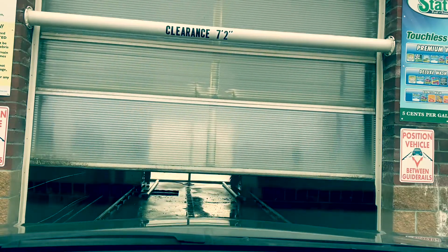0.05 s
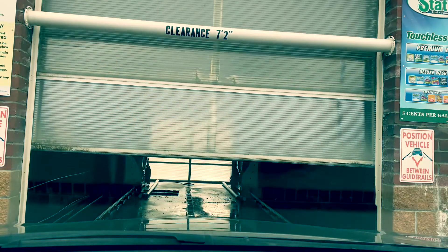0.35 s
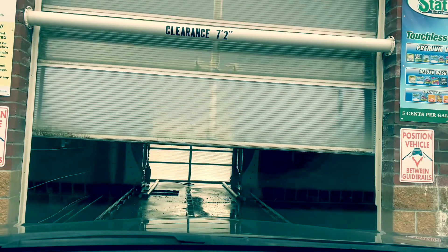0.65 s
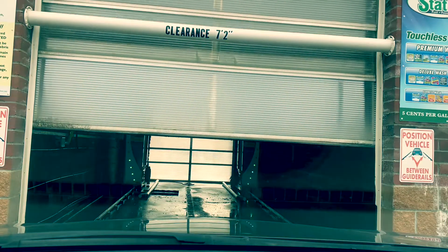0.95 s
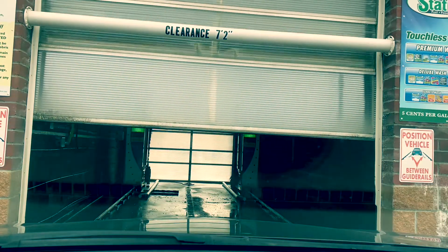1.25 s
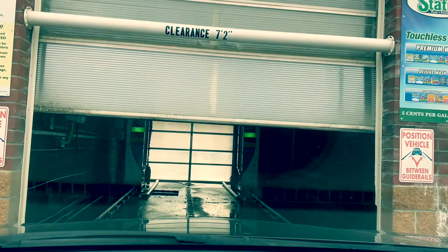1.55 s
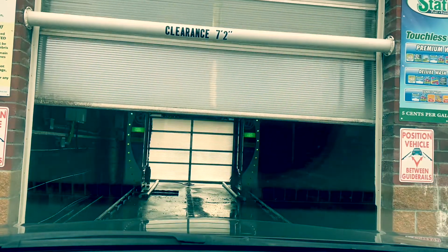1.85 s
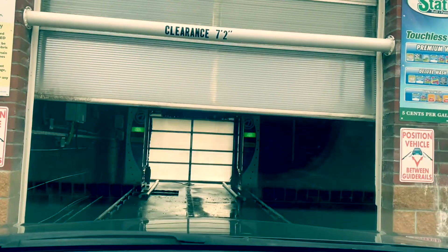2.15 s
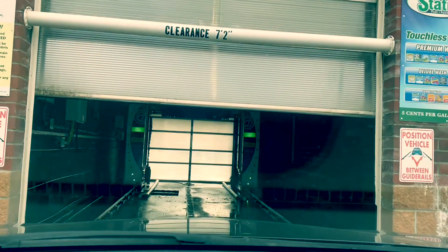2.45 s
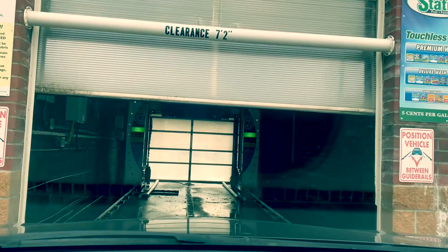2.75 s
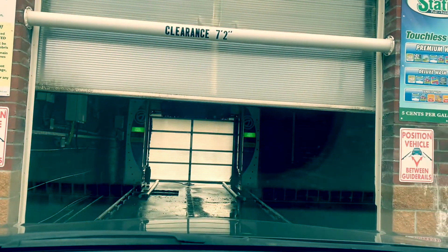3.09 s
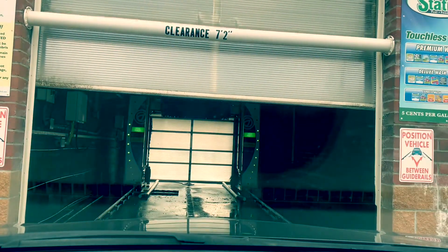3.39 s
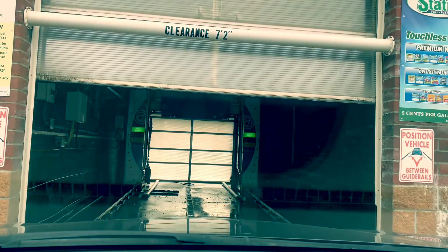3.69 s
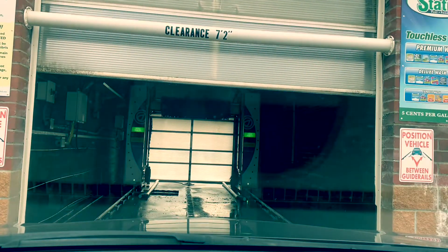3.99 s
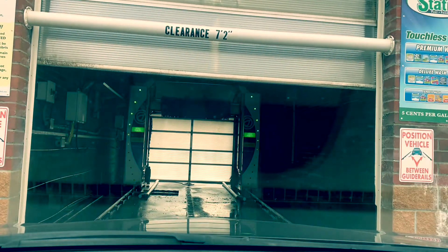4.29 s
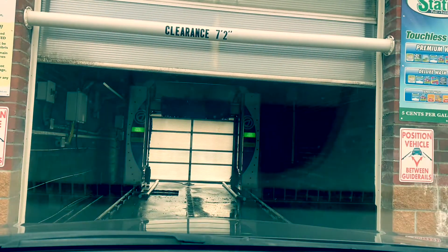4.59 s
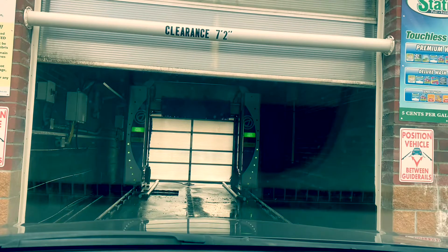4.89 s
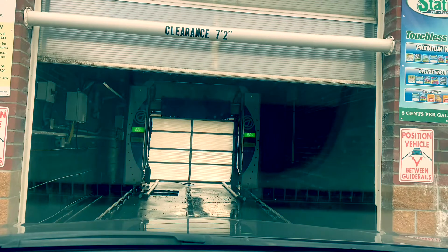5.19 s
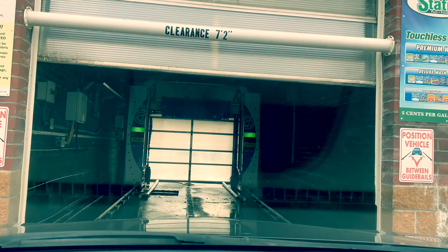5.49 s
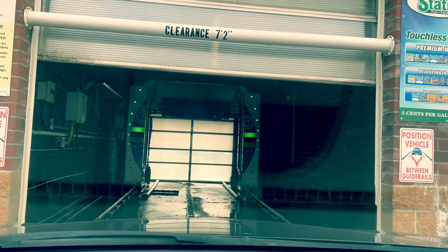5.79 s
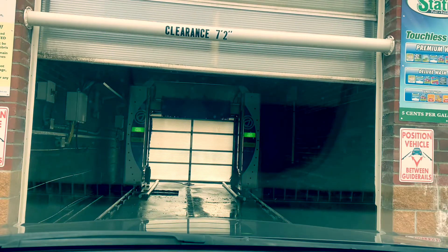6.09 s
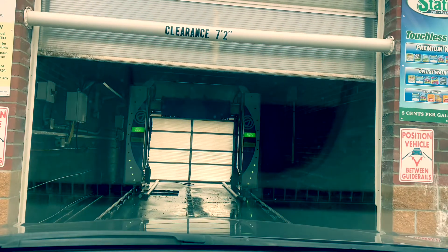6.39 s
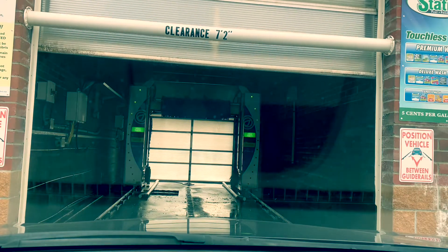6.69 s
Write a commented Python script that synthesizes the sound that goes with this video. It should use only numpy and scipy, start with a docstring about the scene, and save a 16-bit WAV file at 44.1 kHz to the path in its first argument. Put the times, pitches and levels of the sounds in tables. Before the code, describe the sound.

Low engine hum and vent fan in a car, one loud thud like a car door shutting, and a motorized door rolling up.

```python
"""First you hear a low engine hum and a vent fan, from inside a car idling at a car wash.
Beyond the windscreen a roll-up door rises: its motor whirs and its rollers rumble, rasp and squeak.
Near 2 seconds one heavy clunk, like a car door pulled shut, booms in the cabin and sets the trim ringing.
Small knocks, clicks and rustles come and go. A phone with two ports (microphone openings) hears it all."""
import sys
import numpy as np
from scipy import signal
from scipy.fft import rfft, irfft, next_fast_len
from scipy.io import wavfile
from scipy.ndimage import uniform_filter1d

SR = 44100
rng = np.random.default_rng(int(sys.argv[2]) if len(sys.argv) > 2 else 0)


def to_wav(s):
    """Save 16-bit WAV."""
    ch = np.atleast_2d(s).T  # columns
    pcm = np.round(np.clip(ch, -1, 1) * 32767)  # PCM
    wavfile.write(sys.argv[1], SR, pcm.astype(np.int16))


N = 301952
TIME = np.arange(N) / SR
FREQ = np.arange(N // 2 + 1) * SR / N
LEFT_RIGHT = np.array([[1], [-1]])


def undb(db):
    """Turn decibels into a gain."""
    return 10 ** (np.asarray(db) / 20)

def unit(x):
    """Scale to an average (rms) level of 1."""
    return x / np.sqrt(np.mean(x ** 2))

def on_log_axis(points, hz):
    """Read between (Hz, value) points, spaced by octaves."""
    f, value = np.transpose(points)
    return np.interp(np.log(hz + 1), np.log(f), value)

def wobble(rate):
    """A smooth random wobble of size 1, with `rate` new values a second."""
    hold = int(SR / rate)
    steps = np.repeat(rng.standard_normal(N // hold + 1), hold)
    return unit(uniform_filter1d(uniform_filter1d(steps, hold), hold)[:N])

def noise(spectrum, tilt_db=0, ring_hz=1000, ring=0, size=N, low_hz=30):
    """Shaped stereo noise that can ring at one pitch; the bass is alike on both sides."""
    padded = next_fast_len(size, real=True)
    hz = np.arange(padded // 2 + 1) * SR / padded
    mid, side = rfft(rng.standard_normal((2, padded)))
    gain = undb(on_log_axis(spectrum, hz) + tilt_db * np.log2(hz + 1))
    gain *= hz ** 2 / (hz ** 2 + low_hz ** 2)  # thin out the bass
    gain *= 1 + ring / (1 + (18 * (hz / ring_hz - 1)) ** 2)
    width = np.interp(hz, [190, 700, 2000], [0, .36, .52])
    return unit(irfft(gain * (mid + LEFT_RIGHT * side * width), padded)[:, :size])

def burst(t, rise, t60):
    """Swell up to t = 0 and die away; both times are seconds per 60 dB."""
    return np.exp(-np.log(1000) * np.maximum(-t / rise, t / t60))

def step(s, duration):
    """A smooth change from 0 to 1 around time s."""
    return (1 + np.tanh((TIME - s) / duration)) / 2

def swells(rows):
    """Smooth bumps in loudness, added up."""
    return sum(undb(db) * np.exp(-((TIME - s) / half) ** 2) for s, half, db in rows)

def add(out, s, sound):
    """Mix a short sound in at time s."""
    start = int(s * SR)
    out[..., start:start + sound.shape[-1]] += sound[..., :N - start]

def mode(hz, t60):
    """One ringing tone; its ring time t60 is the seconds it takes to fade by 60 dB."""
    t = TIME[:2 * SR]
    return np.sin(2 * np.pi * hz * t) * np.exp(-np.log(1000) * t / t60)

def struck(modes):
    """A struck part rings with several tones, each starting up or down by chance."""
    return sum(rng.choice([-1, 1]) * undb(db) * mode(hz, t60) for hz, db, t60 in modes)

def rubbed(s, half, hz, glide, rough, slip_rate):
    """A gliding friction tone around time s: steady at roughness 0, all chance at 1."""
    t = TIME - s
    slip = np.sqrt(1 - rough ** 2) + rough * (wobble(slip_rate) + 1j * wobble(slip_rate)) / np.sqrt(2)
    tone = np.exp(2j * np.pi * (hz + glide * t / 2) * t)
    return np.exp(-(t / half) ** 4) * np.real(slip * tone)

def reflections(x, strength=0.12, count=14):
    """Glass and trim send back quick echoes that colour the sound."""
    delays = rng.uniform(0.0033, .035, count)
    echoes = sum(rng.choice([-1, 1]) * np.roll(x, int(s * SR), axis=-1) for s in delays)
    return unit(x + strength * echoes)

def hollow(x, hz=588.2, width_hz=420):
    """Make the middle pitches wide and hollow: near hz the left wave is turned upside down."""
    pole = hz ** 2 - FREQ ** 2 + 1j * FREQ * width_hz
    return np.array([irfft(rfft(x[0]) * np.conj(pole) / pole, N), x[1]])

def lean(x, balance):
    """Tip a sound to the left or right, pitch by pitch."""
    return irfft(rfft(x) * undb(LEFT_RIGHT * on_log_axis(balance, FREQ) / 2), N)


# The colour of the hiss. Each row: frequency in Hz, level in dB.
HISS_SPECTRUM = [(2500, -41.5), (5000, 3), (10000, -0.5), (12000, -1), (15000, -18.5)]
# Puffs of hiss. Each row: middle in seconds, half length in seconds, level in dB.
HISS_PUFFS = [(.38, 0.13, -72), (1.08, 0.25, -74), (6.1, 0.101, -84)]

def hiss(db=-75, fade_db_per_s=0.53):
    """A fine hiss fades slowly, with a few puffs on top."""
    level = undb(db - fade_db_per_s * TIME) + swells(HISS_PUFFS)
    return noise(HISS_SPECTRUM) * level * undb(wobble(32))

# The colour of the cabin's rumble. Each row: frequency in Hz, level in dB.
RUMBLE_SPECTRUM = [(20, -31), (34, -0.5), (45, -3), (60, 3.5), (80, -8.5), (120, -12.5), (180, -25),
                   (400, -77.5)]

def rumble(db=-48, fade_db_per_s=2):
    """A deep rumble wavers and slowly fades."""
    return noise(RUMBLE_SPECTRUM) * undb(db - fade_db_per_s * TIME + 1.2 * wobble(4.4))

# Fan and drone as the cabin colours them. Each row: frequency in Hz, level in dB.
FAN_SPECTRUM = [(100, 1), (125, 0.5), (180, -2.5), (270, -1), (340, -9.5), (400, -13), (470, -5.5),
                (525, 3.5), (590, -5.5), (665, 2), (720, -7), (800, -4.5), (900, -16.5), (1000, -26),
                (1090, -15.5), (1320, -13.5), (1450, -26), (4000, -31), (15000, -62)]
SHUT_S, SHUT_TIME_S = 2.4, .15  # after the clunk the fan drops and the drone comes in

def vent_fan(db=-55, drop_db=15.5, rise_db_per_s=1.8, pan_db=3):
    """Air rushes from the vent; it drops after the clunk, then creeps back up."""
    level_db = db - drop_db * step(SHUT_S, SHUT_TIME_S) + rise_db_per_s * np.maximum(TIME - SHUT_S, 0)
    return noise(FAN_SPECTRUM, low_hz=90) * undb(level_db + 0.7 * wobble(13) + LEFT_RIGHT * pan_db / 2)

def wash_bay(db=-61.5, pan_db=-5):
    """An even drone, probably machinery in the bay."""
    return noise(FAN_SPECTRUM, low_hz=253) * step(SHUT_S, SHUT_TIME_S) * undb(db + LEFT_RIGHT * pan_db / 2)

# The tones of the engine. Each row: multiple of the firing rate, relative level in dB.
ENGINE_TONES = [(1, 2), (2, -2.5), (3, -8.5), (4, -26.5), (6, -13)]

def engine(firing_hz=31.2, db=-54.5, drop_db=4.5, settles_s=4.74):
    """Idle firings shake the cabin with low, unsteady tones; the shake eases late on."""
    firings = np.cumsum(firing_hz * (1 + 0.0077 * wobble(1.9))) / SR
    hum = sum(undb(tone_db + 0.98 * wobble(11)) * np.sin(2 * np.pi * k * (firings + rng.random()))
              for k, tone_db in ENGINE_TONES)
    return unit(hum) * undb(db - drop_db * step(settles_s, 0.18))

# The colour of a rustle. Each row: frequency in Hz, level in dB.
RUSTLE_SPECTRUM = [(350, -3.5), (470, -1), (545, 8.5), (605, -3.5), (680, 8), (755, 3.5), (830, -3.5),
                   (930, -3.5), (1020, -14), (1250, -5), (1600, -17), (2500, -28), (5000, -41),
                   (12000, -48)]
# The rustles. Each row: middle in seconds, half length in seconds, level in dB.
RUSTLE_SWELLS = [(.96, 0.37, -51), (2.285, 0.056, -48.5), (2.67, 0.083, -49)]

def rustles(pan_db=-3):
    """Soft uneven brushing close by, a little to the right."""
    brushing = noise(RUSTLE_SPECTRUM, low_hz=246) * swells(RUSTLE_SWELLS)
    return brushing * undb(1.2 * wobble(38) + LEFT_RIGHT * pan_db / 2)

# The colour of a knock or clack. Each row: frequency in Hz, level in dB.
KNOCK_SPECTRUM = [(100, -6), (200, 14), (320, 7), (600, -2.5), (900, -5.5), (1200, -2.5), (1500, -9.5),
                  (2000, -15), (3200, -21), (4400, -23.5), (6500, -31.5), (11000, -40), (15000, -51.5)]
# Knocks on the trim. Each row: time in seconds, level in dB, brightness in dB per octave,
# fade time in seconds, ring pitch in Hz, ring strength.
TRIM_KNOCKS = [(0.351, -43, -16, 0.11, 255, 16), (1.242, -56, 3.5, 0.05, 710, 2),
               (2.012, -43.5, 2.5, 0.11, 2210, 3), (2.033, -46.5, 9, 0.066, 11000, 0.99),
               (2.176, -55, 4, 0.12, 2185, 7.6), (2.237, -51.5, 6.5, 0.064, 2195, 9),
               (2.404, -48, 5, 0.081, 1230, 1.3), (2.845, -45, -5.5, 0.082, 180, 1.8),
               (3.017, -50, 7, 0.044, 4860, 0.96), (3.031, -47, -5, 0.18, 303, 2.9),
               (3.152, -41, -23, .2, 126, 2), (3.345, -43.5, -16, 0.089, 185, 4),
               (3.826, -48.5, 7.5, 0.032, 1900, 2.5), (4.543, -51, -3.5, 0.08, 338, 3),
               (5.049, -52.5, 10.5, 0.038, 6940, 1.8)]

def knocks():
    """Short grainy bursts from the trim: dull ones thud, bright ones click."""
    out, t = np.zeros((2, N)), TIME[:SR // 2]
    grain = undb(2 * wobble(600))
    for s, db, tilt_db, t60, hz, ring in TRIM_KNOCKS:
        contact = noise(KNOCK_SPECTRUM, tilt_db, hz, ring, size=len(t), low_hz=215)
        add(out, s, undb(db) * contact * burst(t - .003, 0.017, t60))
    return out * grain

# Clacks in the door's tracks. Each row: time in seconds, level in dB, brightness in dB per octave,
# fade time in seconds, ring level in dB.
TRACK_CLACKS = [(3.074, -36, 0.5, 0.116, -37.5), (3.137, -41, 0, 0.17, -49), (4.51, -51, 3, 0.18, -62),
                (4.929, -57, 5.5, 0.068, -77), (5.332, -51, 7.5, .045, -63)]
# Taps of a loose hinge. Each row: start in seconds, level in dB.
HINGE_TAPS = [(0.144, -59), (.2, -78), (0.484, -61), (0.634, -62), (0.656, -55), (.849, -56), (1.037, -51),
              (1.068, -58), (1.108, -56), (1.173, -52), (1.213, -51), (1.24, -57), (1.3, -65)]
# How the tracks, a small metal part and the hinge ring.
# Each row: pitch in Hz, level in dB, ring time in seconds.
TRACK_MODES = [(299, -3.5, 0.084), (498, -7.5, .06), (762, -10, .08), (1066, -1.5, 0.084),
               (1260, -6.5, 0.11), (1980, -5.5, 0.1), (2835, -22, 0.059), (3050, -14.5, 0.11),
               (4340, -15, 0.048)]
PING_MODES = [(1793, 2, 0.039), (2840, -7, 0.036), (5280, -1, 0.05), (6960, -13, 0.062)]
HINGE_MODES = [(940, -10, 0.066), (1090, -4, 0.082), (1324, 3.5, 0.1)]

def clacks(ping_s=4.931, ping_db=-53):
    """Hard contacts ring the hollow tracks; a small part pings once and a hinge chatters."""
    out, t = np.zeros((2, N)), TIME[:SR // 2]
    grain = undb(1.2 * wobble(600))
    for s, db, tilt_db, t60, ring_db in TRACK_CLACKS:
        contact = noise(KNOCK_SPECTRUM, tilt_db, size=len(t), low_hz=216)
        add(out, s, undb(db) * contact * burst(t - .003, 0.017, t60))
        add(out, s + .002, undb(ring_db) * struck(TRACK_MODES))
    add(out, ping_s, undb(ping_db) * struck(PING_MODES))
    for s, db in HINGE_TAPS:
        add(out, s, undb(db) * struck(HINGE_MODES))
    return out * grain

# The motor's speed, which sags under load. Each row: time in seconds, turns per second.
MOTOR_SPEED = [(3.2, 46.4), (3.33, 41.57), (3.62, 38.37), (4.2, 32.02), (4.4, 32.66), (5.1, 43.84),
               (5.33, 38.65), (5.6, 41.97), (6.33, 42.87), (6.55, 45.9), (6.85, 48)]
# The tones of its whir (ten slots pass per turn). Each row: multiple of the speed, relative level in dB.
MOTOR_TONES = [(1, 9.5), (5, 8.5), (10, 7.5), (20, -3), (30, -11)]
# Where it works hard. Each row: middle in seconds, half length in seconds, level in dB.
MOTOR_STRAINS = [(3.48, 0.17, -76.5), (4.2, 0.18, -75.5), (5.7, 0.79, -82.5)]

def motor(free_db=-85.5, housing_hz=1300, housing_width_hz=110, housing_db=6):
    """The shaft and slots whir, louder under strain; the housing boosts tones near its own pitch."""
    shaft_hz = np.interp(TIME, *np.transpose(MOTOR_SPEED))
    turns = np.cumsum(shaft_hz * (1 + 0.0032 * wobble(54))) / SR
    whir = np.zeros(N)
    for k, db in MOTOR_TONES:
        lift_db = housing_db / (1 + ((k * shaft_hz - housing_hz) / housing_width_hz) ** 2)
        whir += undb(db + lift_db + 2.5 * wobble(14)) * np.sin(2 * np.pi * k * turns)
    return (undb(free_db) + swells(MOTOR_STRAINS)) * whir

def panel_groan(db=-52.5):
    """A door panel groans with a rough, slowly rising tone."""
    return undb(db) * rubbed(s=0.86, half=.17, hz=715, glide=140, rough=0.95, slip_rate=140)

def edge_scrape(db=-65.5):
    """A metal edge scrapes with a high, falling tone."""
    return undb(db) * rubbed(s=2.32, half=0.12, hz=4260, glide=-800, rough=0.9, slip_rate=1100)

# Squeaks of the rollers. Each row: middle in seconds, half length in seconds, pitch in Hz,
# glide in Hz per second, level in dB, roughness from 0 to 1.
ROLLER_SQUEAKS = [(2.378, 0.044, 1209, 0, -52.5, 0.55), (2.585, 0.047, 1214, 0, -55, 0.54),
                  (2.666, 0.032, 1203, -300, -65, .7), (3.32, 0.093, 1202, -1, -60, 0.9),
                  (3.39, 0.085, 1630, -500, -65, .4), (3.455, 0.062, 1190, 0, -59, 0.5),
                  (3.609, 0.054, 1083, 698, -65.5, .4), (3.785, 0.14, 1195, -2, -60.5, 0.4),
                  (3.87, 0.17, 1077, 0, -64, .7), (5.183, 0.032, 1240, 0, -67, 0.5),
                  (5.582, 0.041, 1250, 404, -68, .2), (5.758, 0.15, 1262, -2, -67.5, .15),
                  (5.919, .04, 1316, 603, -69, .3), (5.984, .08, 1705, 0, -73.5, .3),
                  (6.224, 0.11, 1700, 49, -74.5, 0.34), (6.36, 0.026, 1250, 599, -66.5, .5),
                  (6.463, .065, 1365, 701, -69.5, .3), (6.56, 0.019, 1307, -2, -58, 0.5),
                  (6.595, 0.079, 1380, 198, -68, 0.34)]

def squeaks():
    """Rollers stick and slip, roughly at first and in thinner, cleaner squeals later."""
    tones = sum(undb(db) * rubbed(s, half, hz, glide, rough, slip_rate=150)
                for s, half, hz, glide, db, rough in ROLLER_SQUEAKS)
    return tones * undb(1.4 * wobble(22))

# The colours of rolling and of rasping. Each row: frequency in Hz, level in dB.
ROLL_SPECTRUM = [(120, 12), (200, -1.5), (400, -3.5), (650, -10), (800, -2.5), (980, -9.5), (1170, -7.5),
                 (1450, -19), (2400, -20), (4400, -26.5), (7000, -25), (12000, -55), (15000, -48.5)]
RASP_SPECTRUM = [(1200, -25), (2200, 1), (2800, -3), (3500, 4.5), (4500, -9.5), (5500, -16), (12000, -29)]
# Rasps in the tracks. Each row: middle in seconds, half length in seconds, level in dB.
RASP_SWELLS = [(1.1, 0.58, -70.5), (2.19, 0.03, -62.5), (2.3, 0.043, -65), (2.62, 0.051, -58)]

def roll_up_door(faint_db=-71.5, surge_db=-49, surge_s=2.2, fade_db_per_s=5.5, rattle_db=-17):
    """Rollers rumble and rasp in their tracks; the rolling surges, then fades as the door climbs away."""
    surge = step(surge_s, 0.052) * undb(surge_db - fade_db_per_s * (TIME - surge_s))
    rolling = undb(faint_db) + surge
    rollers = reflections(noise(ROLL_SPECTRUM, low_hz=87)) * rolling * undb(wobble(7.9) + wobble(120))
    rasps = noise(RASP_SPECTRUM) * undb(2 * wobble(220)) * swells(RASP_SWELLS)
    # loose hinges rattle more the harder the door rolls
    rattle = unit(noise(RASP_SPECTRUM) * undb(5.2 * wobble(110))) * rolling * undb(rattle_db)
    return rollers + rasps + rattle

# The clunk's first hit and rebounds. Each row: start in seconds, then push on the frame,
# push on the panel and crack, all in dB.
CLUNK_BLOWS = [(1.8476, -13, -22, -15.5), (1.8505, 2, -12, -23), (1.8607, -15.5, -7.5, -34.5),
               (1.8666, -23, -0.5, -31.5), (1.8795, -17, -6.5, -31), (1.896, -10.5, -17.5, -29.5),
               (1.9406, -20, -35.5, -45), (2.0156, -7.5, -35.5, -47.5)]
# Pushes on the cabin air: the clunk, then two as the body rocks. Each row: start in seconds, level in dB.
AIR_PUSHES = [(1.858, 0.5), (2.245, -27), (2.36, -32)]
# How the body (frame and trim), the metal latch and the cabin air ring.
# Each row: pitch in Hz, level in dB, ring time in seconds.
BODY_MODES = [(113.5, -28, 0.34), (190.2, -11, 0.065), (240, -21.5, .08), (281, -17.5, .09),
              (326.5, -39, 2), (359, -23, .1), (427, -35, .9), (464, -28.5, 0.055), (486, -30, 0.43),
              (526, -33.5, 0.5), (569, -4, 0.052), (614.6, -29.5, 0.61), (624.6, -30, 0.72),
              (646, -30, 0.61), (662, -30, 0.92), (656, -18, 0.031), (684, -36.5, 0.5), (696, -34, 0.72),
              (781, -29, 0.067), (815, -39.5, .57), (913, -27.5, 0.035)]
LATCH_MODES = [(1081, -11.5, .15), (1190, -9, .13), (1343, -8, 0.175), (1570, -18, 0.13),
               (1800, -17.5, .05), (2200, -14.5, .07), (2570, -27, 0.0597), (2975, -8, .035),
               (3090, -14, 0.054), (4050, -17, 0.054)]
AIR_MODES = [(32, -25, 0.51), (41.45, -24, 0.99), (53.45, -5.5, 0.5), (62.8, -7.5, 0.31),
             (92.54, -23.5, 0.7)]
# The colours of the crack and of the dying tail. Each row: frequency in Hz, level in dB.
CRACK_SPECTRUM = [(330, 6), (700, -1), (950, -10.5), (1250, -4.5), (1550, -16), (2400, -20), (3400, -18),
                  (4200, -23.5), (5000, -27.5), (6200, -26.5), (9000, -33.5), (11000, -30.5), (15000, -43)]
TAIL_SPECTRUM = [(30, 2), (70, 12), (130, -5), (260, -17), (410, -17.5), (660, -19), (820, -33),
                 (1200, -26), (1600, -35.5), (4000, -46), (15000, -70)]

def clunk(frame_hz=250, panel_hz=500, crack_noise_db=-2, tail_db=-20.5):
    """Each blow cracks and rings the body and the latch; the cabin air booms and dies away."""
    ring, crack_power = np.zeros(N), np.zeros(N)
    body = np.array([undb(db) * mode(hz, t60) for hz, db, t60 in BODY_MODES])
    for s, frame_db, panel_db, crack_db in CLUNK_BLOWS:
        push_db = on_log_axis([(frame_hz, frame_db), (panel_hz, panel_db)], np.array(BODY_MODES)[:, 0])
        add(ring, s, undb(push_db) @ body + undb(crack_db) * struck(LATCH_MODES))
        crack_power += (undb(crack_noise_db + crack_db) * burst(TIME - s, 0.044, 0.089)) ** 2
    ring *= undb(.45 * wobble(130))  # loose trim roughens the ring
    # neighbouring air tones start in opposite directions, so the boom builds up and then throbs
    boom = sum((-1) ** (k + 1) * undb(db) * mode(hz, t60) for k, (hz, db, t60) in enumerate(AIR_MODES))
    for s, db in AIR_PUSHES:
        add(ring, s, undb(db) * boom)
    cracks = reflections(noise(CRACK_SPECTRUM, low_hz=347), strength=0.087)
    cracks *= np.sqrt(crack_power) * undb(2 * wobble(700))
    tail = reflections(noise(TAIL_SPECTRUM)) * undb(tail_db) * burst(TIME - AIR_PUSHES[0][0], 0.046, 1.145)
    return ring + cracks + tail

# Which way the clunk and all the other sounds lean. Each row: frequency in Hz, left minus right in dB.
CLUNK_BALANCE = [(380, 0), (510, -2), (650, -10), (840, -1), (1290, -.5), (2400, .5), (8000, 0)]
CABIN_BALANCE = [(60, -.5), (200, -1), (380, -1), (700, -1.5), (1000, 1), (2400, .7), (8000, 0)]

def scene():
    """Mix outside and inside; the clunk booms in the middle, its mid-pitched ring louder on the right."""
    outside = hollow(roll_up_door() + wash_bay()) + motor()
    outside += squeaks() + panel_groan() + edge_scrape() + clacks()
    inside = engine() + rumble() + vent_fan() + hiss() + knocks() + rustles()
    return lean(outside + inside, CABIN_BALANCE) + lean(clunk(), CLUNK_BALANCE)

# How far the phone's left port is ahead of its right. Each row: frequency in Hz, lead in radians.
PORT_LEAD = [(0, 0), (500, -.1), (650, .55), (840, 1.25), (1150, 1.4), (1640, 4.4), (2330, 5.1),
             (3190, 8.4), (6460, 18.6), (7580, 16.3), (10400, 12.6), (11600, 12.6), (12600, 9.6),
             (16000, 6.2)]

def record(dry, lift_db=8, lift_hz=8000, top_hz=15800):
    """The ports hear the sound out of step; the phone lifts the treble, clips and cuts the very top."""
    lead = np.interp(FREQ, *np.transpose(PORT_LEAD))
    heard = irfft(rfft(dry) * np.exp(1j * LEFT_RIGHT * lead / 2) * undb(lift_db * (FREQ > lift_hz)), N)
    top_cut = signal.ellip(10, .2, 80, top_hz, fs=SR, output="sos")
    return signal.sosfilt(top_cut, np.clip(heard, -1, 1))


dry = scene()
out = record(dry)
to_wav(out)
```